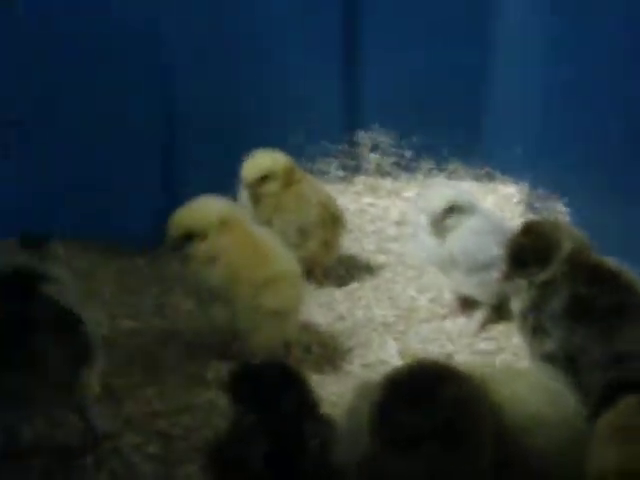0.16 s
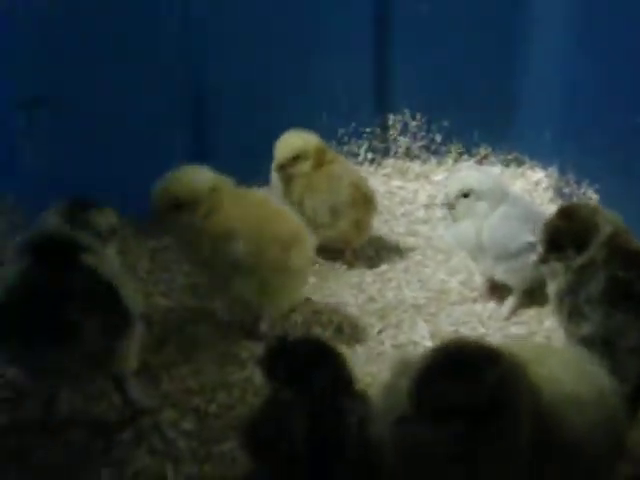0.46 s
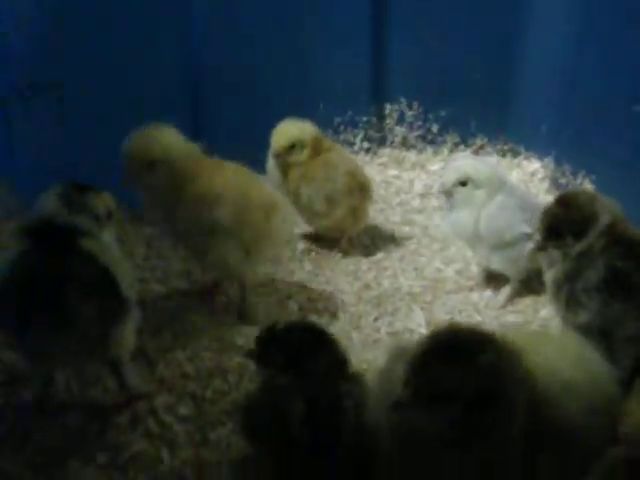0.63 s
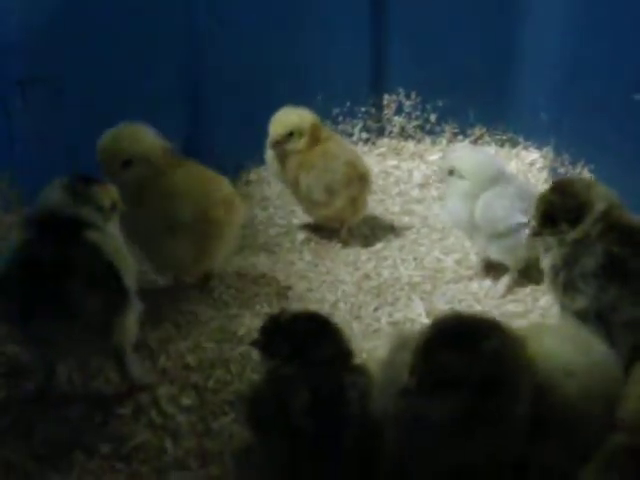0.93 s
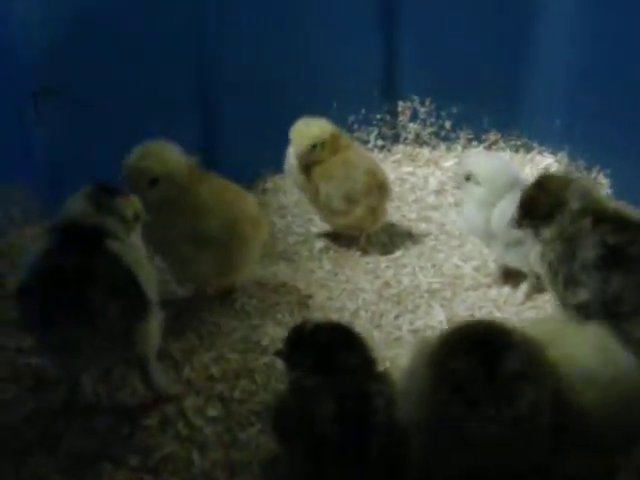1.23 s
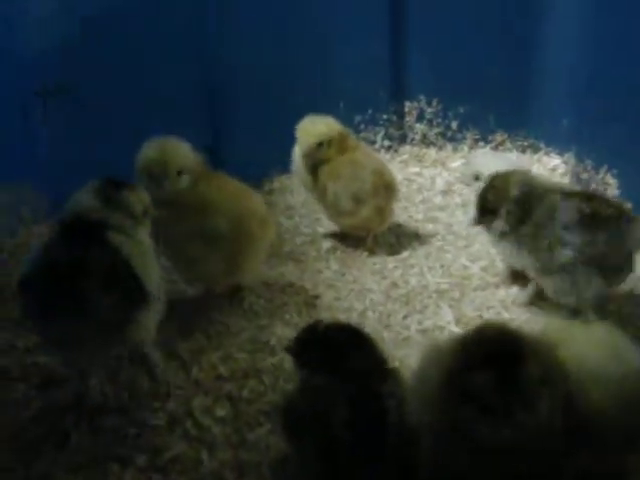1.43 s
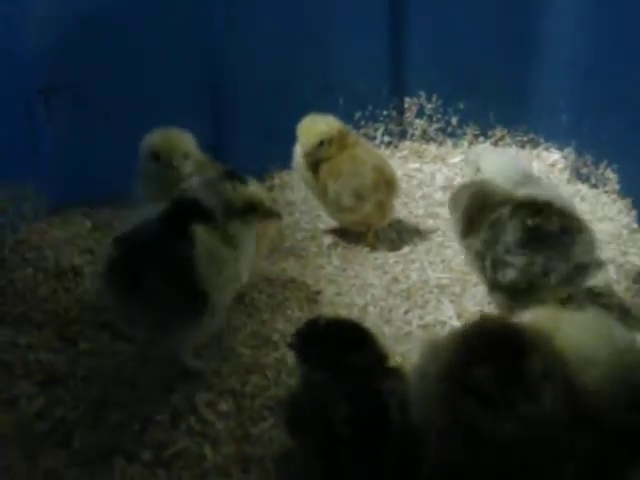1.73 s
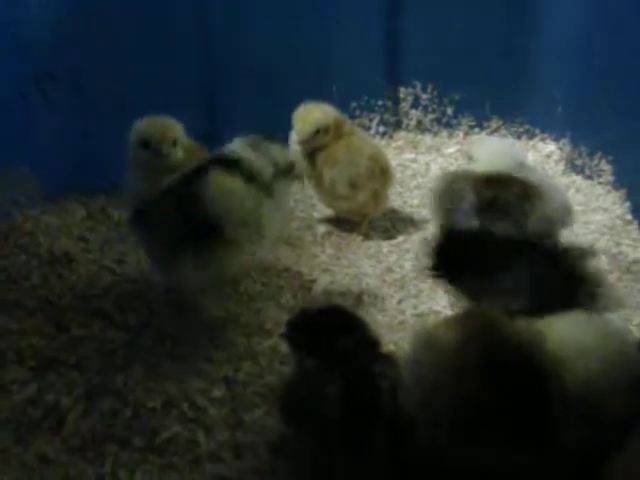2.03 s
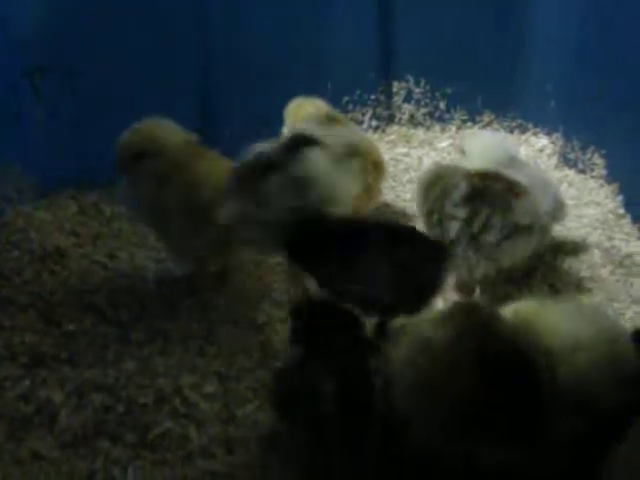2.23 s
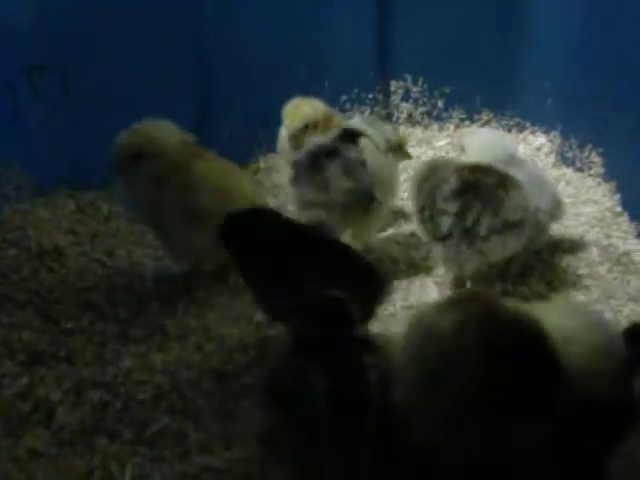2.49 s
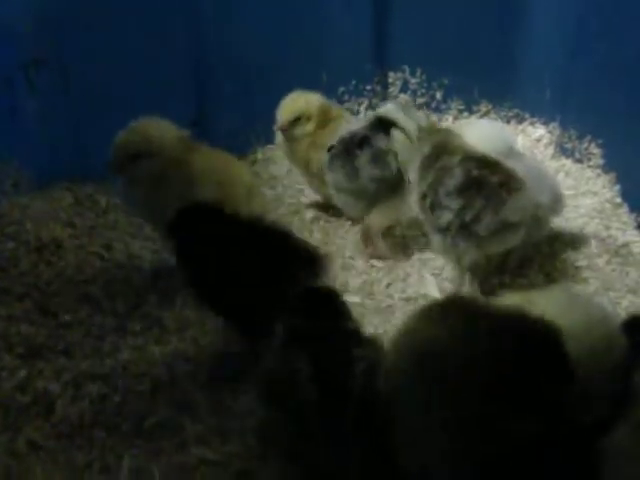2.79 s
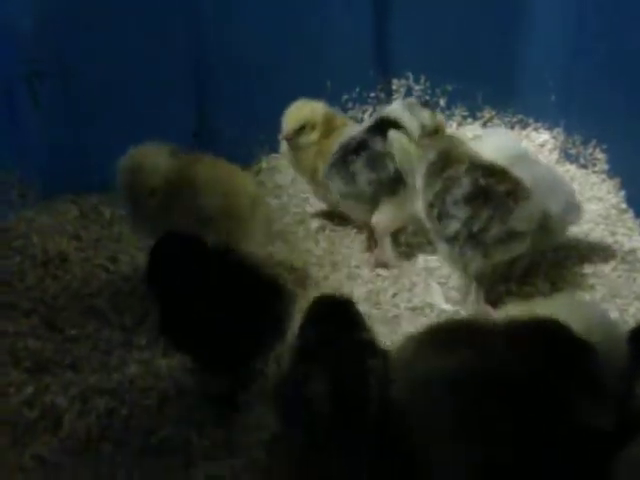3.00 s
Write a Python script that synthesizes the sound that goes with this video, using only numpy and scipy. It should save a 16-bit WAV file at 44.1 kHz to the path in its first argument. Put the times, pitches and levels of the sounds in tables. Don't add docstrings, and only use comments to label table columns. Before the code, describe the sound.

Many baby chicks cheep over one another, bright short falling whistles in a small hard-walled box.

```python
import sys
import numpy as np
from scipy import signal
from scipy.fft import rfft, irfft
from scipy.io import wavfile
from scipy.ndimage import uniform_filter1d

SR = 44100
rng = np.random.default_rng(int(sys.argv[2]) if len(sys.argv) > 2 else 0)


def store_pcm(level_fs):
    pcm = np.round(np.clip(level_fs, -1, 1) * 32767).astype(np.int16)
    wavfile.write(sys.argv[1], SR, np.atleast_2d(pcm).T)


def elevation(decibels):
    levels = np.asarray(decibels, float)
    return 10 ** (levels / 20)


N = 138915

# (start [s], hold [s], fall [s], top pitch [Hz], level [dB])
ARCHED = [
    (0.446, 0.051, 0.015, 5250, -38),
    (2.126, 0.12, .1, 4880, -27.5),
    (1.414, .016, 0.0124, 5200, -39),
    (1.797, .04, 0.011, 5430, -23),
    (3.092, 0.097, .026, 5040, -23.5),
]
# (start [s], hold [s], fall [s], top pitch [Hz], level [dB])
LIFTED = [(0.89, 0.044, 0.011, 4460, -25.5), (1.026, 0.023, 0.016, 5200, -24),
          (1.117, 0.06, 0.076, 6050, -31.5), (1.112, 0.036, 0.008, 5240, -32),
          (1.433, 0.039, 0.011, 5280, -23), (1.612, 0.057, 0.02, 4790, -29.5),
          (1.59, .014, 0.0086, 4750, -30), (1.083, .03, .01, 4870, -48), (2.248, 0.037, 0.013, 5110, -30),
          (2.421, 0.052, 0.063, 3703, -34), (2.227, 0.022, .01, 4500, -37), (2.516, .03, 0.0084, 4400, -36),
          (2.538, 0.024, 0.047, 5020, -31), (2.661, 0.047, 0.02, 5180, -27),
          (2.662, 0.07, 0.047, 4753, -26.5), (2.694, 0.12, 0.074, 4233, -20),
          (2.72, 0.037, 0.064, 5045, -24.5), (2.856, 0.054, 0.044, 4980, -35),
          (2.936, 0.072, 0.057, 4230, -42), (3.022, 0.016, 0.011, 3700, -50)]
# (start [s], hold [s], fall [s], top pitch [Hz], level [dB])
LEVEL_EARLY = [(-0.03, 0.038, 0.075, 4150, -29.5), (-0.02, 0.016, 0.017, 3700, -27),
               (0.157, 0.12, 0.082, 3844, -24), (0.268, 0.037, 0.021, 3220, -27.5),
               (0.387, 0.012, 0.058, 3700, -29), (0.471, 0.066, 0.062, 4573, -24.5),
               (0.585, 0.053, 0.037, 3453, -20), (0.671, 0.072, 0.044, 4980, -25.5),
               (0.637, 0.069, 0.052, 3970, -25.5), (0.737, 0.022, 0.07, 4620, -39.5),
               (0.937, 0.066, 0.03, 3590, -20.5), (0.97, 0.11, 0.087, 3917, -23.5),
               (1.067, 0.11, 0.058, 4886, -27), (1.102, 0.062, 0.058, 4410, -28)]
# (start [s], hold [s], fall [s], top pitch
# [Hz], level [dB])
LEVEL_FURTHER = [(1.175, 0.012, 0.025, 4500, -25), (1.197, 0.015, 0.041, 4300, -24.5),
                 (1.245, 0.031, 0.024, 3400, -21.5), (1.474, 0.025, 0.049, 4400, -30.5),
                 (1.598, 0.13, 0.069, 3958, -21), (1.697, 0.022, 0.039, 4750, -27.5),
                 (2.268, 0.004, 0.053, 3700, -23.5), (2.407, 0.02, 0.06, 4400, -42.5),
                 (2.586, 0.07, 0.044, 4350, -30), (2.589, 0.0086, 0.048, 3730, -27.5),
                 (2.607, 0.011, 0.029, 2754, -18.5), (2.745, 0.0073, 0.03, 4200, -30),
                 (2.835, 0.038, 0.027, 3650, -30), (2.867, 0.018, 0.049, 3430, -28),
                 (2.936, 0.005, 0.068, 3820, -30), (2.992, 0.085, 0.074, 4350, -34.5),
                 (3.036, 0.013, 0.042, 2950, -23.5), (2.714, .022, 0.041, 4445, -28),
                 (0.786, 0.0077, 0.045, 3810, -53), (.582, 0.017, 0.0102, 3620, -19.5)]
# (start [s], hold [s], fall [s], top pitch [Hz], level [dB])
SAGGING = [(-0.02, 0.018, 0.078, 3900, -41), (0.072, 0.099, 0.041, 4040, -30.5),
           (1.063, 0.059, 0.025, 4000, -27), (1.217, 0.025, 0.045, 2835, -18.5),
           (1.222, 0.033, 0.055, 3340, -18.5), (1.499, 0.045, 0.0083, 3794, -27),
           (1.573, 0.049, 0.023, 3780, -30), (1.685, 0.038, 0.04, 3210, -35),
           (1.851, 0.063, 0.0072, 3740, -24), (2.283, 0.053, 0.054, 4306, -25.5),
           (2.284, 0.035, 0.058, 4114, -26.5), (2.777, 0.035, 0.035, 3330, -22),
           (1.958, 0.021, 0.038, 3250, -25), (2.582, 0.034, 0.016, 3000, -29),
           (3.024, .014, .012, 3200, -29)]
# (start [s], hold [s], fall [s], top pitch [Hz], level [dB])
FLAT = [
    (0.223, 0.13, 0.059, 4967, -27),
    (0.682, 0.045, 0.034, 5830, -29.5),
    (1.127, 0.018, 0.042, 4463, -23.5),
    (1.54, 0.011, 0.038, 4090, -23.5),
    (1.863, 0.07, 0.087, 4700, -38),
    (1.912, 0.018, 0.031, 4126, -21.5),
    (2.125, 0.14, 0.026, 4038, -19),
]
# (start [s], hold [s], fall [s], top pitch [Hz], level [dB])
HIGH = [
    (0.025, 0.054, 0.11, 6554, -25.5),
    (0.471, 0.052, 0.1, 6620, -25.5),
    (0.909, 0.056, 0.089, 6550, -23),
    (1.359, 0.05, 0.11, 6560, -23.5),
    (1.857, 0.048, 0.11, 6430, -24.5),
]
# (start [s], hold [s], fall [s], top pitch [Hz], level [dB])
BURRED = [
    (0.603, .052, .1, 5150, -30.5),
    (1.537, 0.096, 0.13, 5550, -24),
    (1.978, 0.1, 0.056, 5446, -27.5),
    (2.414, 0.1, 0.076, 5474, -27.5),
]

SHOULDER = [(0, 0), (.2, .25), (.34, .32), (.55, .45), (.61, .57), (.74, .68), (.88, .86), (1, 1)]
BREAK = [(0, 0), (.33, .17), (.42, .41), (.68, .6), (.88, .78), (1, 1)]
# (start pitch / top [ratio], bend of hold [power], bend of fall [power], swell [dB])
KINDS = [
    (.85, 2.6, 0.81, 11.5),
    (.92, 2.9, 1.6, 10.5),
    (1.04, 0.982, 1.9, 9),
    (1.116, 1.01, 1.9, 10.5),
    (1, 9., 1.6, 10.5),
]
# (start pitch / top [ratio], bend of hold [power], fall [steps], swell [dB])
STEPPED = [
    (0.845, 2.578, SHOULDER, 17),
    (.9, 3.18, BREAK, 17.5),
]

# (frequency [Hz], gain [dB])
BEAK = [(2300, -4), (3000, -7.5), (4000, 5.5), (5000, 5), (7300, -6.5), (7800, -17.5), (12000, -7.5),
        (16000, -11.5)]
OVERTONES_DB = [0, -8.5, -16, -27.5]
# (top pitch [Hz], overtone gain [dB])
OVERTONE_GAIN = [(3000, -0.5), (3850, 7.5), (4300, -3.5), (6500, -8.5)]
# (top pitch [Hz], pitch where the voice stops [Hz])
STOP = [(3500, 2000), (4300, 2400), (5000, 2800), (6500, 2750)]
# (offset / pitch [ratio], level [dB])
BURR = [(.1, -8), (-.095, -18), (.2, -19)]

# (frequency [Hz], density [dB per Hz])
AIR = [(25, -6.5), (81, -14), (546, -17.5), (970, -23), (1400, -23.5), (2830, -25), (4910, -9),
       (15500, -63)]
# (time [s], peak level [dB])
KNOCKS = [
    (0.084, -52),
    (0.172, -54),
    (0.216, -54.5),
    (0.249, -54),
    (0.329, -53.5),
    (0.411, -50.5),
    (0.439, -48.5),
    (0.471, -51.5),
    (0.99, -57),
]
# (frequency [Hz], level [dB])
BODY_MODES = [(115, 4.2), (160, 8.1), (230, 1.4)]

END_HZ = 2213
ATTACK_S, RELEASE_S, KNEE_S = 0.0027, 0.026, 0.0051
WOBBLE, WOBBLE_HZ = 0.008, 25
FLUTTER_DB, FLUTTER_HZ = 1.5, 45
RASP, RASP_S = 0.35, 0.002
STOP_SPAN_HZ, FALL_BRIGHT_DB = 350, -1
PUSH_DB = 1.5
BURR_START, BURR_END = 0.45, 0.93
ROOM_DB, ROOM_T60, EARLY_DB, EARLY_S = -23.5, 0.44, -7.5, 0.0063
AIR_DB = -53.5
HUM_HZ, HUM_DB, HUM_WAVER_HZ = 325, -66, 2.5
BODY_T60, RUB_DB, RUB_START_S, RUB_END_S = 0.2, -53, 0.075, 0.446
HISS_DB, HISS_FOLLOW_S, HISS_TILT = -26, 0.0013, 0.023
CEILING = 0.62
EDGE_HZ = 15780


def evened(x):
    return x / np.sqrt(np.mean(x ** 2) + 1e-20)


def read(points, hz):
    f, value = np.transpose(points)
    return np.interp(np.log(hz + 1), np.log(f + 1), value)


def add(mix, s, sound):
    at = round(s * SR)
    sound = sound[max(-at, 0):]
    part = mix[max(at, 0):][:len(sound)]
    part += sound[:len(part)]


def drift(t, top_hz, phases):
    f = np.geomspace(top_hz / 6, top_hz, len(phases))[:, None]
    return np.sin(2 * np.pi * (f * t + phases[:, None])).sum(0) * np.sqrt(2 / len(phases))


def ring(x, hz, width):
    r = np.exp(-np.pi * width / SR)
    return evened(signal.lfilter([1], [1, -2 * r * np.cos(2 * np.pi * hz / SR), r * r], x))


def peep_pitch(t, left, gone, top_hz, kind, chance):
    ratio, lift, drop, _ = kind
    fallen = np.interp(gone, *np.transpose(drop)) if np.ndim(drop) else gone ** drop
    hz = top_hz * (1 + (ratio - 1) * left ** lift) - (top_hz - END_HZ) * fallen
    hz = uniform_filter1d(hz, int(KNEE_S * SR) + 1, mode="nearest")
    return hz * (1 + WOBBLE * drift(t, WOBBLE_HZ, chance[:6]))


def whistle(hz, turns, gone, top_hz, chance):
    overtone_db = read(OVERTONE_GAIN, top_hz) + FALL_BRIGHT_DB * np.sqrt(gone)
    tone = 0
    for k, db in enumerate(OVERTONES_DB, 1):
        level = elevation(db + read(BEAK, k * hz) + (k > 1) * overtone_db)
        tone = tone + level * (k * hz < EDGE_HZ) * np.sin(k * turns + chance[k] * 6)
    return tone


def second_voice(hz, turns, share):
    on = np.clip(np.minimum(share - BURR_START, BURR_END - share) / 0.12, 0, 1)
    return on * sum(elevation(db + read(BEAK, hz)) * np.sin((1 + off) * turns) for off, db in BURR)


def peep(row, kind, burred, chance):
    start, hold, fall, top_hz, level_db = row
    _, _, drop, swell_db = kind
    t = np.arange(0, hold + fall, 1 / SR)
    left = np.clip(1 - t / hold, 0, 1)
    gone = np.clip((t - hold) / fall, 0, 1)
    hz = peep_pitch(t, left, gone, top_hz, kind, chance)
    turns = 2 * np.pi * np.cumsum(hz) / SR
    tone = whistle(hz, turns, gone, top_hz, chance)
    if burred:
        tone = tone + second_voice(hz, turns, t / hold)

    breath = np.clip((hz - read(STOP, top_hz)) / STOP_SPAN_HZ, 0, 1)
    attack = np.clip(t / ATTACK_S, 0, 1)
    release = np.clip((t[-1] - t) / min(RELEASE_S, fall), 0, 1)
    edges = attack * release * np.where(gone > 0, breath, 1)
    rasp = 1 + RASP * np.sqrt(gone) * drift(t, 1 / RASP_S, chance[3:9])
    effort_db = level_db - swell_db * left + FLUTTER_DB * drift(t, FLUTTER_HZ, chance[6:])
    if np.ndim(drop):
        effort_db = effort_db + PUSH_DB * np.clip(gone / 0.29, 0, 1)
    return start, np.sqrt(2) * edges * rasp * elevation(effort_db) * tone


def chicks():
    arched, lifted, level, sagging, flat = KINDS
    shouldered, broken = STEPPED
    calls = [(ARCHED, arched), (LIFTED, lifted), (LEVEL_EARLY, level), (LEVEL_FURTHER, level),
             (SAGGING, sagging), (FLAT, flat), (HIGH, shouldered), (BURRED, broken)]
    out = np.zeros(N)
    for table, kind in calls:
        for row, chance in zip(table, rng.random((24, 12))):
            add(out, *peep(row, kind, table is BURRED, chance))
    return out


def brooder(x):
    t = np.arange(SR // 2) / SR
    signs = rng.choice([-1., 1.], len(t))
    taps = signs * (rng.random(len(t)) < 2000 / SR) * (t > 0.002)
    early = taps * np.exp(-t / EARLY_S * 2)
    late = taps * elevation(-60 * t / ROOM_T60)
    early = elevation(EARLY_DB) * early / np.linalg.norm(early)
    late = elevation(ROOM_DB) * late / np.linalg.norm(late)
    return x + signal.fftconvolve(x, early + late)[:N]


def air():
    spectrum = rfft(rng.standard_normal(N)) * elevation(read(AIR, np.fft.rfftfreq(N, 1 / SR)))
    noise = irfft(spectrum, N)
    hum_hz = HUM_HZ + HUM_WAVER_HZ * drift(np.arange(N) / SR, 3.3, rng.random(8))
    hum = np.sqrt(2) * np.sin(2 * np.pi * np.cumsum(hum_hz) / SR)
    return elevation(AIR_DB) * evened(noise) + elevation(HUM_DB) * hum


def fingers():
    out = np.zeros(N)
    t = np.arange(SR // 5) / SR
    for (s, db), tune in zip(KNOCKS, rng.random((20, len(BODY_MODES)))):
        modes = sum(elevation(d) * np.sin(2 * np.pi * (f * t + p)) for (f, d), p in zip(BODY_MODES, tune))
        add(out, s, elevation(db + 1.0 - 60 * t / BODY_T60) * np.minimum(t / 0.0019, 1) * modes)
    time = np.arange(N) / SR
    on = np.clip(np.minimum(time - RUB_START_S, RUB_END_S - time) / 0.044, 0, 1)
    rub = sum(elevation(d) * ring(rng.standard_normal(N), f, 28) for f, d in BODY_MODES)
    return out + elevation(RUB_DB) * on * evened(rub)


def scene():
    return (brooder(chicks()) + air() + fingers())[None]


def riding_hiss(x):
    slope = np.diff(x, prepend=0) * 2
    step = np.sqrt(abs(uniform_filter1d(slope ** 2, int(HISS_FOLLOW_S * SR) + 1)))
    hiss = signal.lfilter([1], [1, -HISS_TILT], rng.standard_normal(x.shape))
    return elevation(HISS_DB) * step * hiss


def low_pass(x):
    return signal.sosfilt(signal.butter(12, 16660, fs=SR, output="sos"), x)


def record(dry):
    hiss = riding_hiss(dry)
    rounded = dry / (1 + (abs(dry) / CEILING) ** 6) ** (1 / 6)
    band = signal.firwin(511, EDGE_HZ, window=("kaiser", 9), fs=SR)
    mix = signal.oaconvolve(rounded + hiss, band[None], "same")
    return low_pass(mix)


dry = scene()
out = record(dry)
store_pcm(out)
```